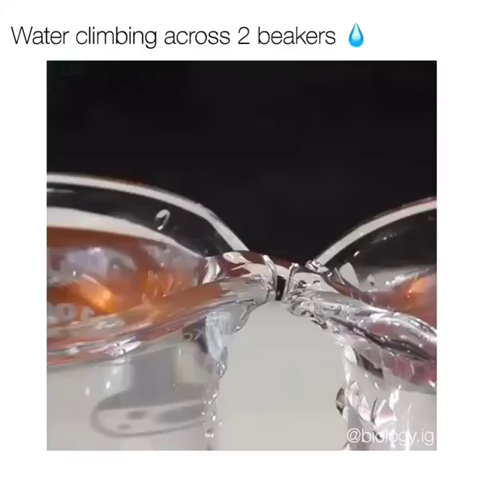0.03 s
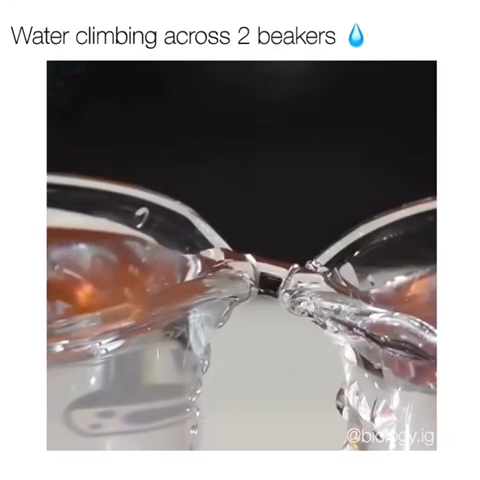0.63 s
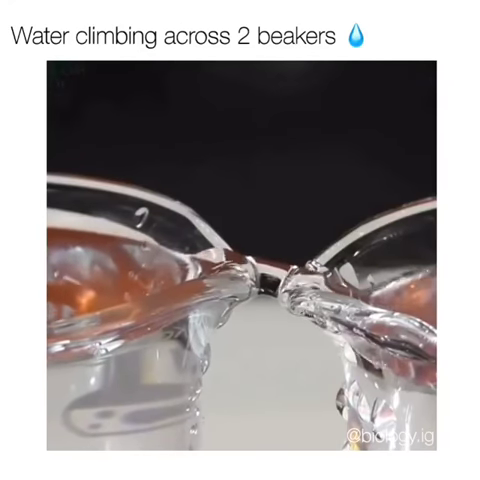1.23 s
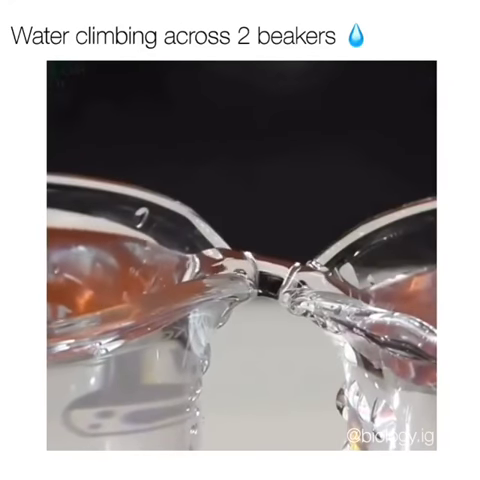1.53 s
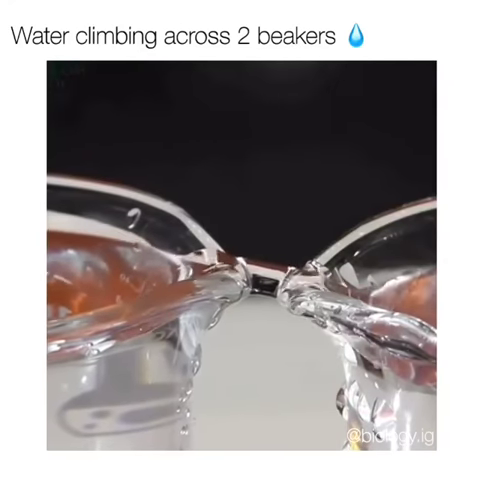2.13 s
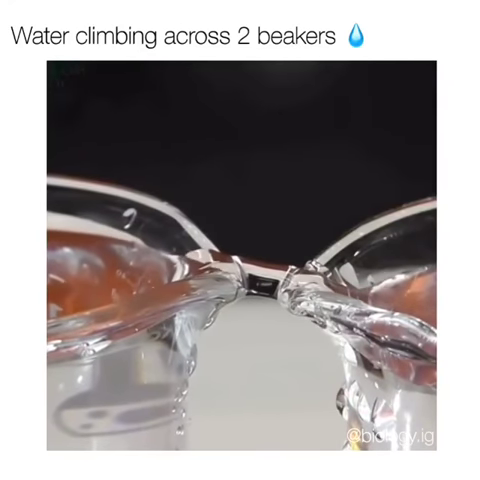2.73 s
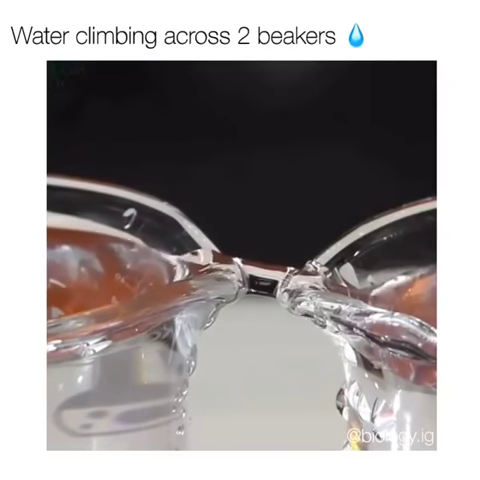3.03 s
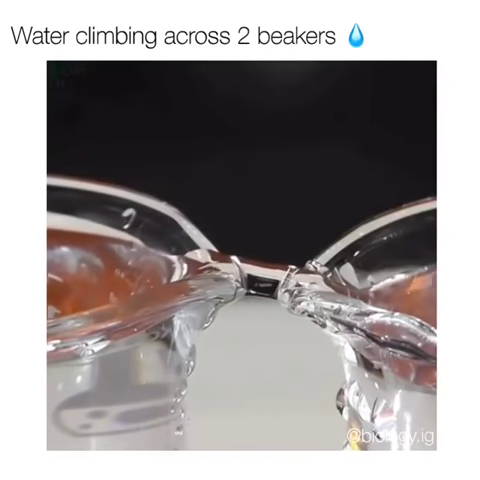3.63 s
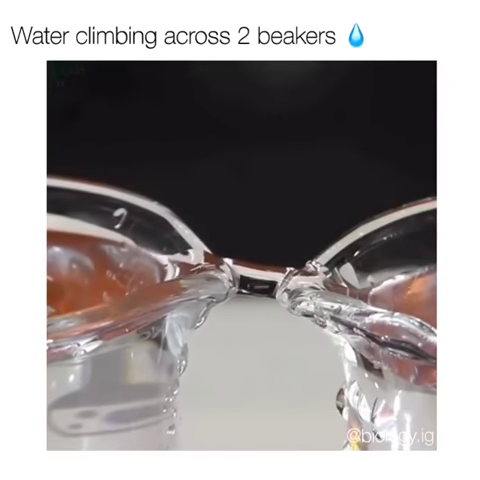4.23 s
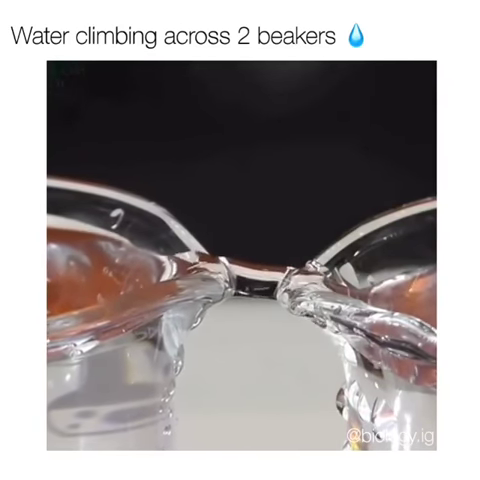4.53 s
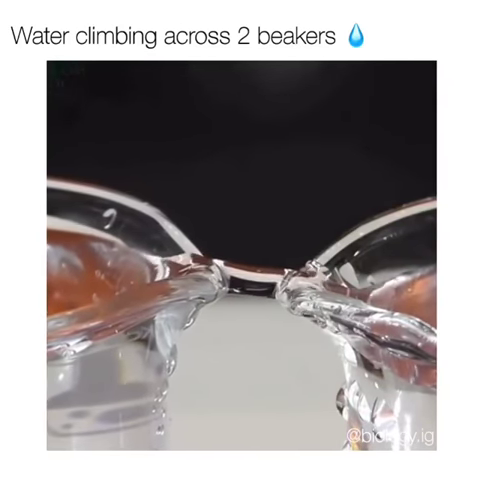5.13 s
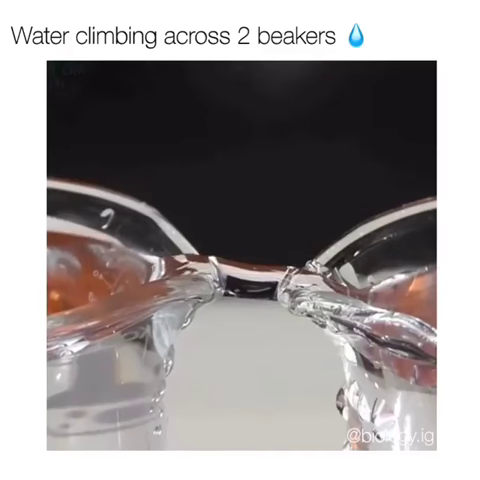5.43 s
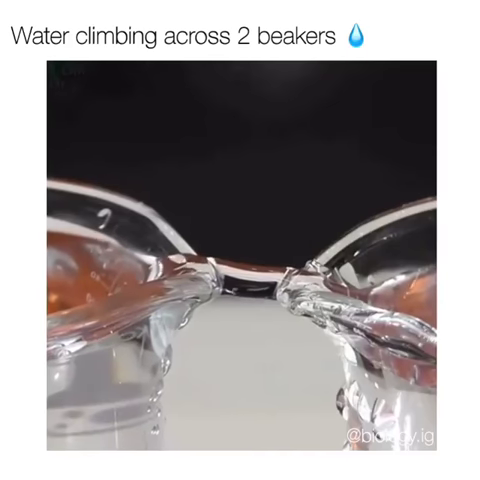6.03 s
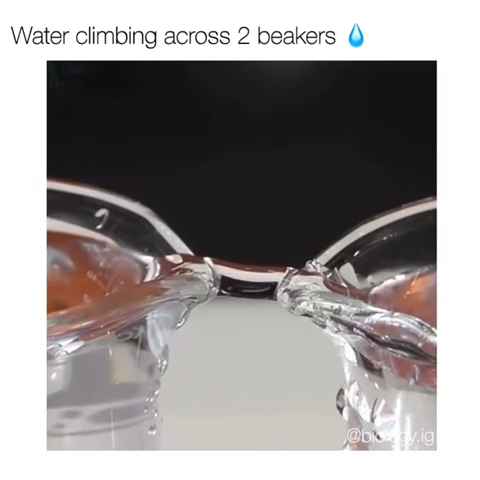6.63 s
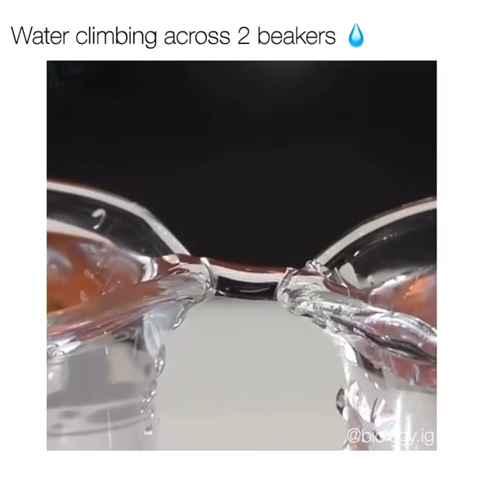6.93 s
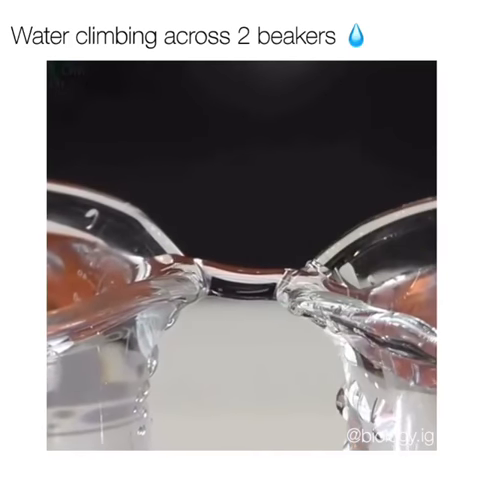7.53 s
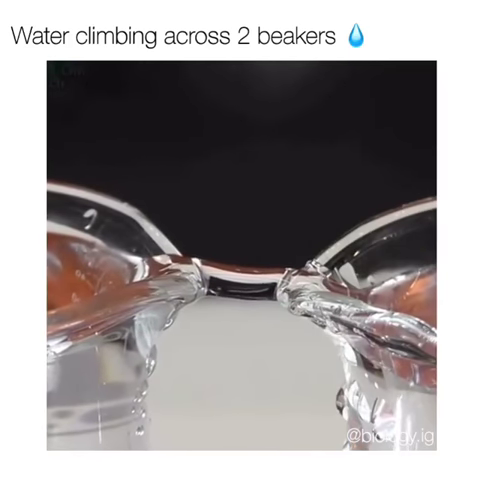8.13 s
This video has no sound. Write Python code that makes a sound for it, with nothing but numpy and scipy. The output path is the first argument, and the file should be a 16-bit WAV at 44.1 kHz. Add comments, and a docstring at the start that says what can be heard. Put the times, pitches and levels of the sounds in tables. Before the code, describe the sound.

From about 0.2 seconds, electrical equipment hums quietly in a small room, with a thin metallic buzz from a loose cover, a faint electric sizzle and a low ventilation rumble. A hard object clicks nearby at 0.4 seconds. The loudest sounds are two sharp, bright clicks at 1.4 and 1.6 seconds, followed by two light knocks just before 2 seconds. At 2.4 seconds the buzz flares into a very short rattle, stays a little stronger, then dies down between 3.8 and 4.4 seconds, leaving a softer hum. Three tiny ticks come around 4.5 seconds. The sizzle creeps up slightly and stops at about 5.8 seconds. Between 7.2 and 8 seconds there are a faint tap and a few soft scuffs. The hum and ventilation continue to the end, a little after 8 seconds.

```python
"""Mains-powered equipment hums in a small room as its core flexes twice per mains cycle.
Its loose metal cover chatters on every half cycle, flares once into a rattle and then settles;
a thin electric sizzle stops later. A hard object clicks a few times on a bench nearby, and something
scuffs briefly near the end. Ventilation rumbles low underneath it all."""
import sys
import numpy as np
from scipy import signal
from scipy.fft import rfft, irfft, next_fast_len
from scipy.io import wavfile

SR = 44100
rng = np.random.default_rng(int(sys.argv[2]) if len(sys.argv) > 2 else 0)


def int16_out(signal):
    """Quantize to a 16-bit WAV file."""
    q = np.round(np.clip(np.atleast_2d(signal).T, -1, 1) * 32767)
    wavfile.write(sys.argv[1], SR, q.astype(np.int16))


N = 369999
TIME = np.arange(N) / SR
MAINS_HZ = 59.975
PULSE_HZ = 2 * MAINS_HZ  # one pulse per half cycle; `pulses` below is their running count


# The hum's main tones: (multiple of PULSE_HZ, level with cover seated [dB], level with cover loose [dB])
HUM_TONES = [(1, -71.5, -60), (2, -72.5, -64.5), (3, -63.5, -63), (4, -68.5, -66), (5, -59, -55.5),
             (6, -67.5, -63.5), (7, -58.5, -65.5), (8, -65, -61.5), (9, -79, -67), (10, -70, -64),
             (11, -74, -68.5), (12, -70.5, -69.5), (13, -85, -60), (14, -78, -80), (16, -87, -82),
             (17, -75.5, -71.5), (18, -84.5, -78), (21, -78.5, -74)]
# Faint tones between the main ones: (odd multiple of MAINS_HZ, level [dB])
FAINT_TONES = [(7, -81), (11, -87), (15, -78.5), (19, -84), (21, -83), (23, -89), (25, -84)]
# Thin whines that do not follow the mains: (pitch [Hz], level [dB])
WHINE_TONES = [(1809, -82), (5432, -90)]

def hum(pulses, waver_db=.5, seated_db=-70, span_db=16, travel_s=0.02, travel_hz=1000):
    """The core flexes with each pulse, not quite evenly; a loose cover changes which tones come out."""
    def tone(cycles, db):
        return amp(db + waver_db * wobble(4.6)) * np.sqrt(2) * np.sin(2 * np.pi * cycles)

    looseness = np.clip((tap_level() - seated_db) / span_db, 0, 1.2)
    drone = 0
    for multiple, tight_db, loose_db in HUM_TONES:
        # A wave of travel_hz crosses the casing in travel_s. Lower ones lag, smearing pulses to a drone.
        lag_cycles = 2 * travel_s * np.sqrt(travel_hz * PULSE_HZ * round(multiple))
        level_db = tight_db + looseness * (loose_db - tight_db)
        drone += tone(round(multiple) * pulses - lag_cycles, level_db)
    faint = sum(tone(round(multiple) * pulses / 2 + rng.random(), db) for multiple, db in FAINT_TONES)
    whines = sum(tone(hz * TIME, db) for hz, db in WHINE_TONES)
    return drone + faint + whines


# How hard the cover taps as it slips from seat to seat: (time [s], level [dB])
TAP_LEVELS = [(.18, -59), (2.4, -58.8), (2.42, -54.8), (3.1, -55), (3.82, -58), (3.85, -63), (4.1, -66),
              (4.12, -70), (4.27, -73), (4.33, -67), (4.37, -73.5), (8.11, -79), (8.18, -69.5)]
FLARE_START_S, FLARE_RISE_S, FLARE_HOLD_S, FLARE_FALL_S = 2.407, 0.012, 0.024, 0.04

def tap_level(flare_db=10.5):
    """How hard the cover taps at each moment, in dB: the steady chatter plus its one flare."""
    return curve(TAP_LEVELS) + flare_db * swell(FLARE_START_S, FLARE_RISE_S, FLARE_HOLD_S, FLARE_FALL_S)


# The pitches at which the metal cover rings: (pitch [Hz], width [Hz], level [dB])
COVER_RINGS = [(3454, 98, 4.5), (3820, 330, -4), (4026, 94, 7.5), (4395, 110, 3), (5630, 76, -18),
               (6510, 69, -3), (6790, 78, -1.5), (7400, 73, -8), (9020, 64, -3.5), (9200, 156, -5),
               (10700, 120, -18), (12200, 400, -16)]

def cover_response(hz, steepness=1.2):
    """The cover rings near its own pitches and passes little in between."""
    peaks = (amp(db) / (1 + ((hz - pitch) / width) ** 2) ** steepness for pitch, width, db in COVER_RINGS)
    return fastest_attack(np.sqrt(sum(peak ** 2 for peak in peaks)))


def chatter(pulses, treble_hz=5200, brightening=0.51):
    """The cover taps once per pulse; harder taps are brighter and the hardest break up into a rattle."""
    tap_at = np.interp(np.arange(1, int(pulses[-1]) - 1), pulses, np.arange(N))
    # Each tap is spread over nearby samples, so it can land between two and keep the rhythm even.
    nearby = tap_at.astype(int)[:, None] + np.arange(-8, 9)
    offset = nearby - tap_at[:, None]
    shape = np.sinc(offset) * np.sinc(offset / 9)
    strength = amp(.5 * rng.standard_normal((len(tap_at), 1)))
    taps = unit(np.bincount(nearby.ravel(), (strength * shape).ravel(), N))
    rattle = rng.standard_normal(N) * bursts(pulses, decay_s=0.003)
    level_db = tap_level()
    rattle_share = np.interp(level_db, [-52, -44], [.01, .35])
    blows = np.sqrt(1 - rattle_share) * taps + np.sqrt(rattle_share) * rattle
    buzz = unit(filtered(blows, cover_response))
    treble = signal.sosfiltfilt(signal.butter(4, treble_hz, "high", fs=SR, output="sos"), buzz)
    hardness_db = np.clip(level_db, -72, -54) + 61
    return amp(level_db) * (buzz - treble + amp(brightening * hardness_db) * treble)


# The tone of the shaking casing: (frequency [Hz], level [dB])
CASING_SPECTRUM = [(600, -27), (720, 0), (900, -25), (1200, 5.5), (1400, -5), (1560, 7.5), (1750, -21),
                   (2100, -18), (2600, -15)]

def flare(pulses, level_db=-45.5, lag_s=0.006, ring_on_s=.002, roughness=0.44):
    """The hardest taps shake the whole casing, which joins in late and rings lower than the cover."""
    shaking = swell(FLARE_START_S + lag_s, FLARE_RISE_S, FLARE_HOLD_S, FLARE_FALL_S + ring_on_s)
    mains_tones = sum(amp(db) * np.sin(2 * np.pi * (round(hz / PULSE_HZ) * pulses + rng.random()))
                      for hz, db in CASING_SPECTRUM)
    rattle = noise(CASING_SPECTRUM) * bursts(pulses, decay_s=0.016)
    return amp(level_db) * shaking * unit(unit(mains_tones) + roughness * rattle)


# The tone of the hiss before it is tilted brighter or duller: (frequency [Hz], level [dB])
SIZZLE_SPECTRUM = [(1200, -18), (2700, 2.5), (3500, 1), (4500, 0), (5000, -6), (5550, -1.5), (5950, -3),
                   (6500, -2.5), (6850, 2), (7200, -2), (8000, -1.5), (9700, 1.5), (10250, -6), (10800, 0),
                   (11800, -6), (13300, -6.5), (14000, -4.5)]

def sizzle(pulses, start_db=-68, rise_db_per_s=1.06, stop_s=5.75, fade_s=0.03, flutter_db=2.05):
    """A thin electric hiss pulses with the mains, creeps up and stops; the taps add a hiss of their own."""
    def hiss(db_per_octave):
        return noise([(hz, db + db_per_octave * np.log2(hz)) for hz, db in SIZZLE_SPECTRUM])

    level = amp(start_db + rise_db_per_s * TIME) * np.clip(1 - (TIME - stop_s) / fade_s, 0, 1)
    electric = level * hiss(db_per_octave=1.5) * bursts(pulses, decay_s=0.02)
    duller = hiss(db_per_octave=-3)
    tap_hiss = (duller - keep_lows(duller, edge_hz=3200)) * bursts(pulses, decay_s=0.04)
    tap_gain = amp(tap_level() - 2.5)  # a little under the chatter
    return (electric + tap_gain * tap_hiss) * amp(flutter_db * wobble(30))


# Each hit of the hard object; the last four columns adjust parts of its sound:
# (time [s], level [dB], spot struck [0-2], knock [dB], thud [dB], highs [dB], top snap [dB])
HITS = [(0.4367, -36, 0, -21, -6.5, -10, 0), (1.4069, -22, 1, -38, -38, -1.5, 1),
        (1.4098, -28, 1, -34, -32, -2, -6), (1.4168, -30, 1, -15.5, -29, -11, -8),
        (1.6043, -28.5, 2, -36, -34, 1, 6), (1.884, -46.5, 2, -18, -14, -10, 4),
        (1.989, -49.5, 1, -10, -10, -9, 0), (4.411, -55, 2, -20, -20, 0, 17),
        (4.476, -53.5, 2, -20, -20, 3, 22), (4.54, -57.5, 2, -20, -20, -1, 10),
        (7.281, -63, 2, -13, -12, 2, 0)]
# The object's ringing tones; a t60 is the time taken to fade by 60 dB:
# (pitch [Hz], t60 [s], level at spot 0 [dB], level at spot 1 [dB], level at spot 2 [dB])
OBJECT_RINGS = [(1405, 0.054, -17, -12, -22), (1960, 0.064, -24, -9, -27), (2066, 0.061, -15, -4.5, -14),
                (2440, 0.11, -27, -14, -18), (2590, 0.057, -28, -7, -28), (2710, 0.12, -24, -18, -8),
                (2830, 0.05, -15, -7, -18), (3210, 0.15, -26, -17, -10.5), (3400, 0.041, -22, -6, -4),
                (3580, 0.087, 2.5, -12, -6), (3730, 0.068, -18, 1, -6), (3840, .06, -2, -10, -14),
                (4320, 0.078, -13, -10, -14), (4480, 0.024, 8.5, -2, -0.5), (5421, 0.084, -14, -8, -24),
                (6040, 0.075, -22, -7, -16), (6640, .055, -10, 6, -6), (6955, .08, -8, -17, -2),
                (7068, .14, -14, -6, -18), (7480, 0.074, 3, -11, 2), (11200, 0.074, -22, -31, -14)]
# The tone of a hit's sharp crack: (frequency [Hz], level [dB])
CRACK_SPECTRUM = [(200, -30), (500, -28), (1000, -2.5), (1600, -3.5), (2100, -7.5), (3600, 7), (5000, -3),
                  (6200, 1.5), (7200, 6.5), (7800, -6), (9300, -8), (10200, -19), (14000, -18)]
# The tones of the knocked bench: (pitch [Hz], level [dB])
BENCH_RINGS = [(388, 7.5), (720, -10), (950, -7)]
# The bench's dull thud: (frequency [Hz], level [dB])
THUD_SPECTRUM = [(120, -8), (350, 1), (550, 0), (1000, -10), (1600, -22), (3000, -50)]

def clicks(ring_db=-4, crack_t60=0.038, room_t60=0.19, knock_t60=0.12, thud_t60=0.086,
           highs_hz=5800, snap_hz=10000, hard_hit_db=-40):
    """Each hit cracks, rings the tones its spot favours, knocks the bench and echoes briefly in the room."""
    out, t = np.zeros(N + SR), np.arange(SR // 4) / SR
    tone = lambda hz: np.sin(2 * np.pi * (hz * t + rng.random()))
    fade = lambda db, t60: amp(db - 60 * t / t60)
    spike = amp(12) * (t == 0)
    tail = fade(-5, crack_t60) + fade(-18, room_t60)
    crack_hz, crack_db = np.transpose(CRACK_SPECTRUM)
    for start_s, db, spot, knock_db, thud_db, highs_db, snap_db in HITS:
        # Each hit has its own brightness: its high tones are raised or lowered by highs_db.
        ring = sum(fade(spot_db[round(spot)] + highs_db * (hz > highs_hz) + rng.normal(0, 1), t60)
                   * tone(hz) for hz, t60, *spot_db in OBJECT_RINGS)
        shaped_db = crack_db + highs_db * (crack_hz > highs_hz) + snap_db * (crack_hz > snap_hz)
        blow = spike + tail * rng.standard_normal(len(t))
        crack = filtered(blow, lambda hz: fastest_attack(unit(gain_at(hz, crack_hz, shaped_db))))
        crack *= amp(.2 * min(db - hard_hit_db, 0))  # light hits crack less
        knock = fade(knock_db, knock_t60) * sum(amp(level) * tone(hz) for hz, level in BENCH_RINGS)
        thud = fade(thud_db, thud_t60) * noise(THUD_SPECTRUM, size=len(t))
        out[round(start_s * SR):][:len(t)] += amp(db) * (amp(ring_db) * ring + crack + knock + thud)
    return out[:N]


# The tone of the rubbing: (frequency [Hz], level [dB])
RUB_SPECTRUM = [(400, -10), (1350, 7), (1750, -2), (1950, 0), (2350, -6), (2830, 5), (3020, -3), (3250, 5),
                (3480, -6), (3680, 4), (3900, -7), (4500, -10), (6800, -11), (9000, -32)]
# Soft touches and slides: (time of peak [s], level [dB], rise and fall time [s], upper edge [Hz])
SCUFF_STROKES = [(7.198, -53, .007, 2700), (7.57, -61, .04, 2400), (7.695, -55, .014, 2000),
                 (7.78, -64, .03, 2000), (7.897, -57, 0.018, 5000), (7.928, -61.5, .018, 4500),
                 (7.972, -52.5, 0.022, 9000)]

def scuff(grain_db=2):
    """Something touches and slides in short strokes that swell and fade, catching unevenly."""
    rub = unit(noise(RUB_SPECTRUM) * amp(grain_db * wobble(250)))
    return sum(amp(db) * np.exp(-abs(TIME - peak_s) / fade_s) * keep_lows(rub, edge_hz, steepness=6)
               for peak_s, db, fade_s, edge_hz in SCUFF_STROKES)


# The tone of the air duct's rumble: (frequency [Hz], level [dB])
DUCT_SPECTRUM = [(20, -38), (36, -25), (57, -5), (68, -0.5), (80, -5), (103, 5), (135, -0.5), (163, -3.5),
                 (180, -0.5), (212, 6.5), (243, -4.5), (264, 0.5), (288, -10), (305, -9.5), (500, -34)]
# The tone of the steady airy hiss: (frequency [Hz], level [dB])
AIR_SPECTRUM = [(150, -1.5), (380, 7), (520, 2.5), (900, -1), (1200, -5), (1500, -4.5), (1760, -11),
                (2000, -3), (2380, -13.5), (2720, -8), (3060, -19), (3400, -13.5), (5000, -35), (5300, -35),
                (5450, -16), (5700, -32.5), (14000, -18.5)]

def ventilation(bass_db=-53.5, duct_db=-54.5, air_db=-61.0, bass_follows=0.11):
    """A duct rumbles under an even airy hiss; the bass is a little fuller while the cover chatters."""
    rumble = noise(DUCT_SPECTRUM)
    bass = keep_lows(rumble, edge_hz=155)
    chatter_db = curve(TAP_LEVELS)
    lift_db = bass_follows * (chatter_db - chatter_db.mean())
    air = amp(air_db + 0.21 * wobble(15)) * noise(AIR_SPECTRUM)
    return amp(bass_db + lift_db) * unit(bass) + amp(duct_db) * unit(rumble - bass) + air


def amp(db):
    """Turn decibels into a number to multiply a sound by."""
    return 10 ** (np.asarray(db) / 20)


def unit(x):
    """Scale to an average (rms) level of 1."""
    return x / np.sqrt(np.mean(x ** 2) + 1e-20)


def curve(rows):
    """Join (time [s], value) points with straight lines, one value per sample."""
    return np.interp(TIME, *np.transpose(rows))


def wobble(rate):
    """A random curve that heads for a new value `rate` times a second."""
    points = rng.standard_normal(int(N * rate / SR) + 4)
    return np.interp(TIME * rate, np.arange(len(points)), points)


def swell(start_s, rise_s, hold_s, fall_s):
    """Rise from 0 to 1, hold, and fall back."""
    t = TIME - start_s
    return np.clip(np.minimum(t / rise_s, 1 - (t - rise_s - hold_s) / fall_s), 0, 1)


def bursts(pulses, decay_s):
    """A level that jumps up on each pulse and then dies away."""
    return unit(np.exp(-(pulses % 1) / PULSE_HZ / decay_s))


def filtered(x, response):
    """Multiply each frequency in x by response(hz)."""
    size = next_fast_len(len(x) + 8192)
    return irfft(rfft(x, size) * response(np.fft.rfftfreq(size, 1 / SR)), size)[:len(x)]


def keep_lows(x, edge_hz, steepness=10):
    """Fade out the frequencies above edge_hz."""
    return filtered(x, lambda hz: 1 / (1 + (hz / edge_hz) ** steepness))


def gain_at(hz, points_hz, points_db):
    """Read the gain at hz off a line drawn through the points."""
    return amp(np.interp(np.log(hz + 1), np.log(points_hz), points_db))


def noise(spectrum, size=N):
    """Noise at an average level of 1, shaped by (frequency [Hz], level [dB]) rows."""
    return unit(filtered(rng.standard_normal(size), lambda hz: gain_at(hz, *np.transpose(spectrum))))


def fastest_attack(gain):
    """A filter with these gains that starts as sharply as possible and rings only afterwards."""
    cepstrum = irfft(np.log(gain + 1e-6))
    cepstrum[1:len(gain) - 1] *= 2
    cepstrum[len(gain):] = 0
    return np.exp(rfft(cepstrum))


def scene():
    """Mix the sources; hum, chatter, flare and sizzle share the same slightly drifting mains pulses."""
    pulses = PULSE_HZ * TIME + 0.0018 * wobble(1.9)
    equipment = hum(pulses) + chatter(pulses) + flare(pulses) + sizzle(pulses)
    return (equipment + ventilation() + clicks() + scuff())[None]


def record(dry):
    """The sound cuts in after a short silence; the microphone misses one narrow band and the very top."""
    start_s, top_hz = 0.175, 13980
    notch_hz, width_hz, depth = 3045, 66, 0.93

    def microphone(hz):
        band = 1j * hz * width_hz / (notch_hz ** 2 - hz * hz + 1j * hz * width_hz)
        return (1 - depth * band) * (hz < top_hz)

    return filtered(dry[0] * (TIME > start_s), microphone)[None]


dry = scene()
out = record(dry)
int16_out(out)
```